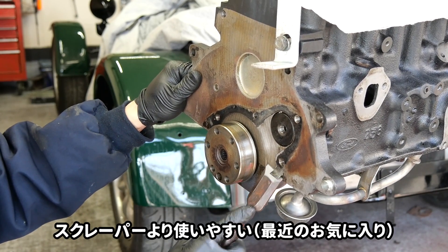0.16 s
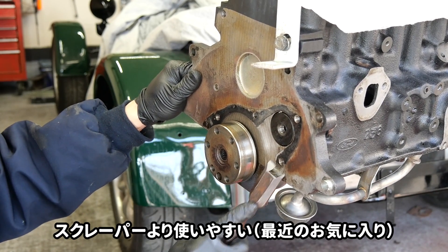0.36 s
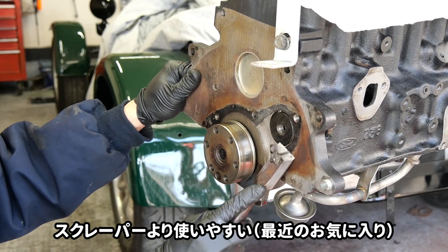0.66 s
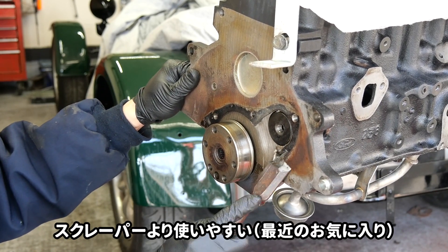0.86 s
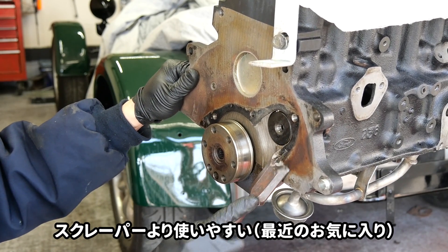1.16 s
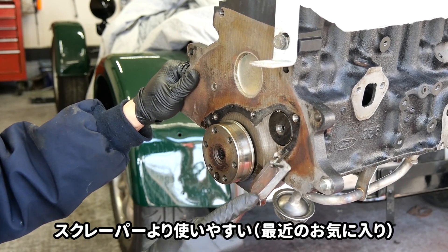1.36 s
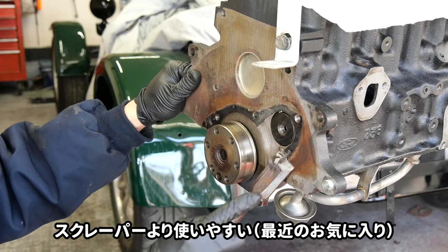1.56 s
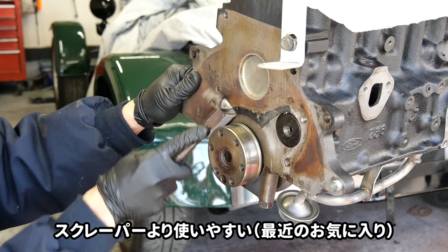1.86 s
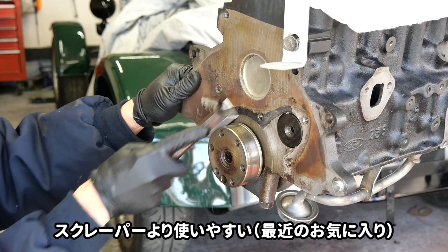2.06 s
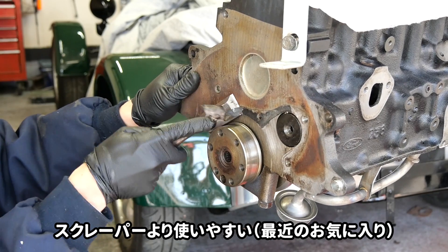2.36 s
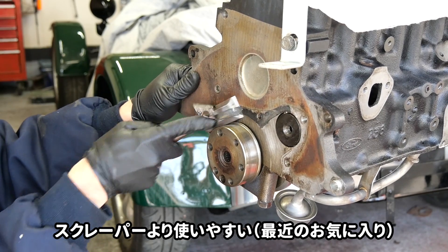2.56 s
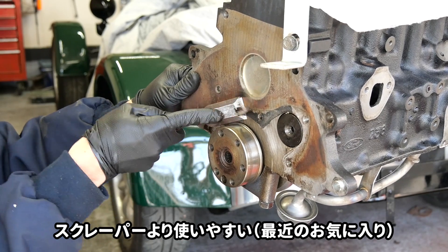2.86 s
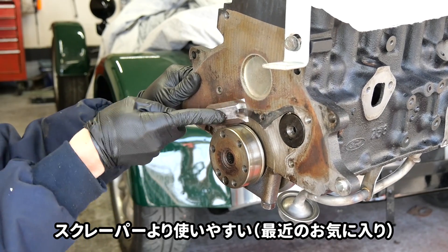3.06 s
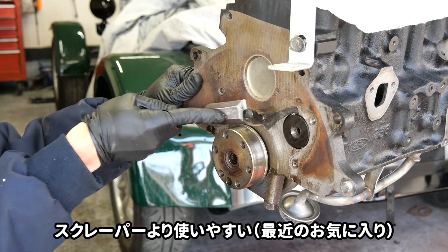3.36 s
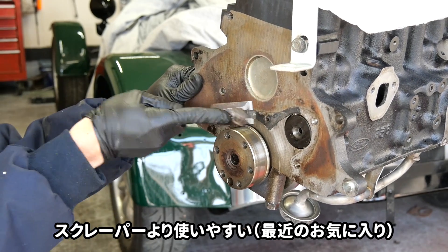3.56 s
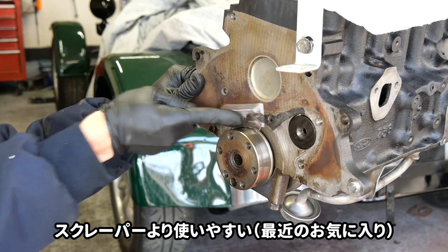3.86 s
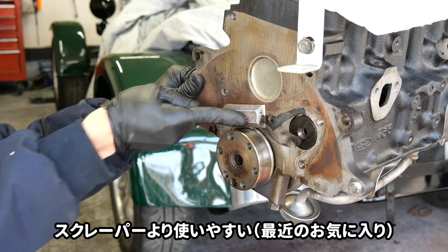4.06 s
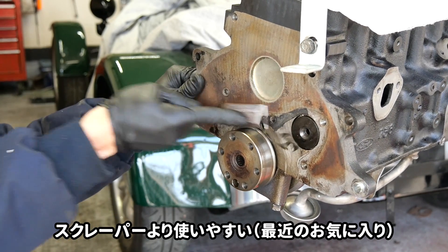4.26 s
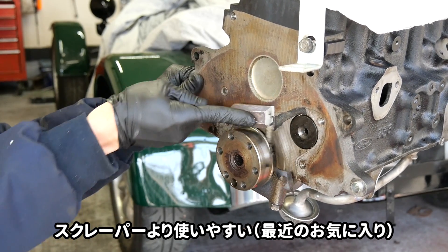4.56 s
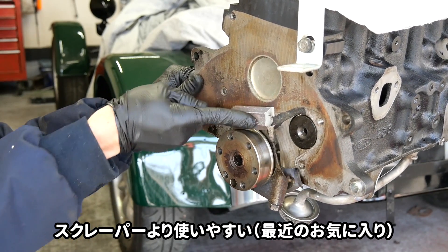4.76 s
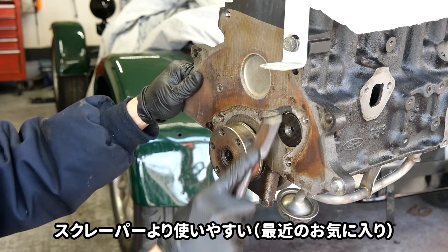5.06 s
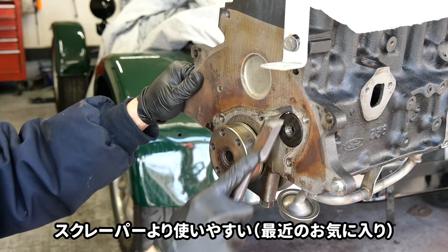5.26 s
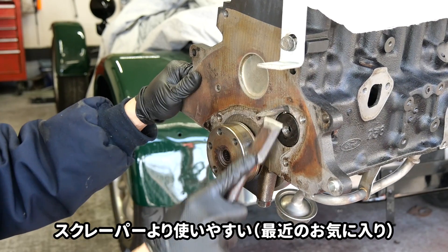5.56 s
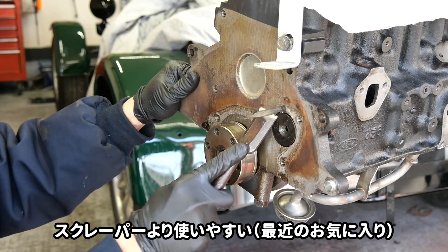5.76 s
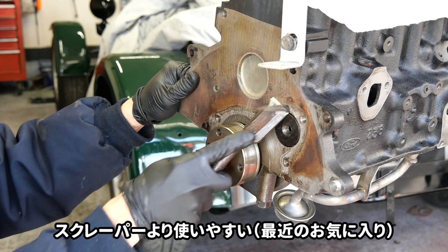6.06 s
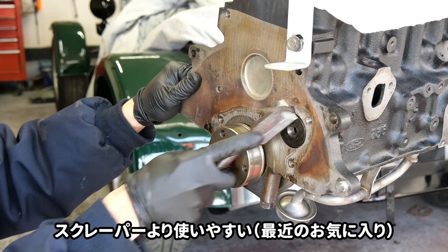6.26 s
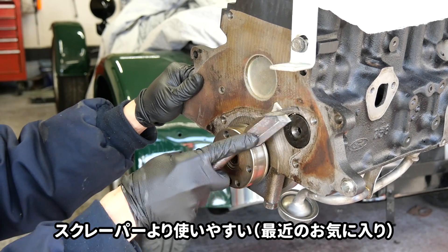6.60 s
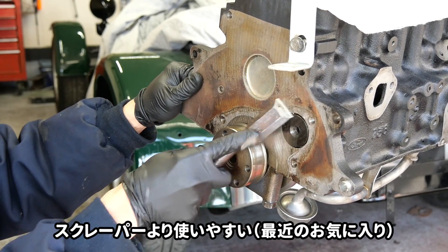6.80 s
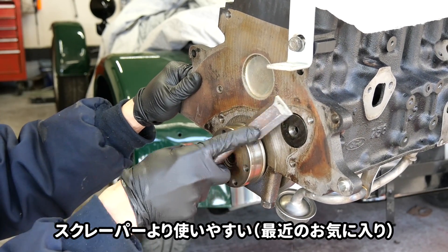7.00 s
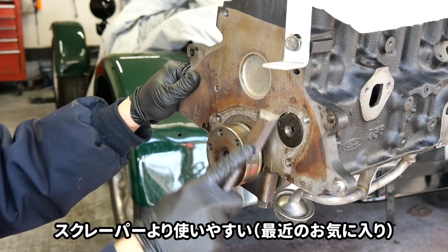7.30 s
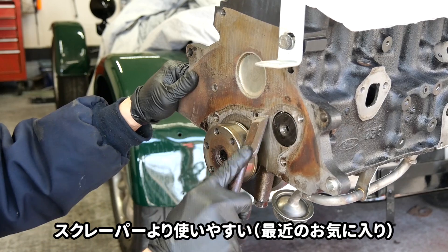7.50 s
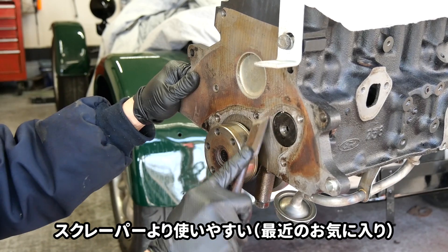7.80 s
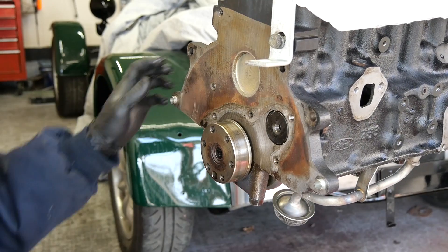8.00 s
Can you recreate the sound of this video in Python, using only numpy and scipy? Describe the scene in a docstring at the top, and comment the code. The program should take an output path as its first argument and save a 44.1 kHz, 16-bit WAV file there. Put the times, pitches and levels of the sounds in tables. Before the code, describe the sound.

A hand chisel scrapes old gasket off a cast engine block, close to the microphone, for about eight seconds. From the start it moves quickly back and forth, roughly five times a second, each stroke a short, dry rasp with a thin metallic ring. Tiny chips tinkle faintly in the first second. The edge jumps and knocks on the casting lightly at 0.7 seconds and harder at 1.9. A stronger scrape bites near 2.9, followed by the sharpest clacks at 3.3, 3.9 and 4.3 seconds. The scraping eases briefly before 5 seconds, then continues a little lighter, with duller knocks around 5.3, 5.7, 6.5, 6.7 and 7.4. A few more chips tick between 4.5 and 6.6 seconds. One longer, light drag rises in pitch near 7.3, before a few last strokes. Underneath lie a soft sleeve rustle and steady workshop hush, with a short reverberation.

```python
"""A workshop, with a stereo camera microphone close to a cast engine block.
A hand chisel scrapes old gasket off the block in quick to-and-fro strokes: the edge sticks and slips,
ringing the blade. Now and then it jumps and knocks on the casting, and chips tinkle.
A sleeve rustles with the work; behind it lie the hush of the shop and a short reverberation."""
import sys
import numpy as np
from scipy import signal
from scipy.fft import rfft, irfft, next_fast_len
from scipy.io import wavfile
from scipy.ndimage import uniform_filter1d

SR = 44100
rng = np.random.default_rng(int(sys.argv[2]) if len(sys.argv) > 2 else 0)


def master(y):
    """Save y as 16-bit WAV."""
    cut = np.clip(np.atleast_2d(y).T, -1, 1)
    pcm = np.round(cut * 32767)  # scale
    wavfile.write(sys.argv[1], SR, pcm.astype(np.int16))


N = 358797
TIME = np.arange(N) / SR

# Colours of the room tone and the cloth. Each row: frequency in Hz, relative level in dB.
SHOP_COLOUR = [(30, -15), (52, -12.5), (220, -10.5), (320, -12.5), (690, -2.5), (860, 5.5), (1200, -9),
               (3000, -20), (15000, -47)]
CLOTH_COLOUR = [(40, -31), (230, -8.5), (650, -5), (870, 2), (1250, -8.5), (3300, -8.5), (15000, -33)]
# Colours of a knock's dull and sharp parts, then of a scrape's coarse and fine parts. Rows as above.
THUD_COLOUR = [(250, -44), (600, -11.5), (950, 8), (1400, 3), (2400, -52)]
CRACK_COLOUR = [(60, -18), (450, 2), (1200, -5), (4200, 11), (9700, -1.5), (12300, 5.5), (15500, -12)]
RASP_COLOUR = [(250, -49.5), (1900, -4), (2500, 10.5), (4200, 9), (5200, 0.5), (9000, -25.5)]
HISS_COLOUR = [(3500, -20), (6400, 5.5), (7300, -3.5), (8300, -0.5), (10200, -12), (12200, -1.5),
               (15500, -28)]
# Modes of a chip and of the block. Each row: frequency in Hz, relative level in dB, T60 in seconds.
CHIP_MODES = [(9450, 6, 0.57), (9460, 17, 0.026), (10300, 12, 0.059), (11700, -10, .12)]
CASTING_MODES = [(1420, -6, 0.045), (3480, 5, 0.19), (3760, 11, 0.16), (4460, -40, 0.11)]
# The arm's movement. Each row: time in seconds, sleeve level in dB.
SLEEVE_LEVELS = [(0, -46.5), (1.72, -46.5), (2.1, -53.5), (4.4, -53), (4.92, -54.5), (5.3, -52.5),
                 (6.1, -52), (7.7, -55), (7.95, -50), (8.14, -42)]
# Hard bits landing. Each row: start in seconds, relative peak level in dB.
CHIP_LANDINGS = [(.0583, -49), (.3486, -41), (.5511, -42), (.6526, -40), (4.5121, -42), (4.8888, -53),
                 (5.1996, -47), (5.3996, -39), (5.6052, -47), (6.6024, -45)]
# The edge hits the casting. Each row: start in seconds, clack level in dB,
# hardness from 0 (cushioned by gasket) to 1 (bare steel).
EDGE_KNOCKS = [(0.6865, -29.5, 0.62), (0.9215, -36, 0.52), (1.7451, -30, 0.98), (1.8275, -36, 1),
               (1.8901, -18.5, 0.63), (2.1472, -22.5, 0.49), (3.1825, -34, .4), (3.296, -16.5, 0.92),
               (3.7129, -26, .85), (3.9322, -14.5, 0.95), (4.1404, -26.5, 1), (4.335, -14.5, 0.96),
               (4.5388, -22.5, 0.57), (4.7498, -31, 0.16), (5.079, -31, 0.045), (5.2885, -17.5, .25),
               (5.558, -25.5, .1), (5.689, -25, 0.32), (6.5482, -24, 0.48), (6.7382, -21.5, 0.58),
               (7.3747, -23.5, 0.37), (7.4788, -30.5, 0.19)]
# The grip shifts the blade's lower bending resonance (flex); the edge's angle sets its ring.
# Each row: time in seconds, base frequency in Hz.
FLEX_PITCH = [(0.0, 1820), (0.8, 1580), (1.7, 1710), (2.6, 1536), (4.4, 1610), (6.0, 1730), (7.2, 1610)]
RING_PITCH = [(0.02, 3700), (0.83, 3450), (3.22, 3450), (3.3, 3650), (4.13, 3660), (4.27, 3350.0),
              (4.35, 3700), (5.29, 3340), (5.4, 3660), (5.68, 3200), (6.13, 3670.0), (6.24, 3410),
              (7.03, 3455), (7.91, 3490)]
# Tone along the seam. Each row: time in seconds, flex and grit levels in dB against the ring.
SEAM_TONE = [(0.02, -9, -10), (0.38, -9.5, -6), (0.7, -11, -13), (1.74, -10.5, -11), (1.84, -23, -21),
             (1.91, -12, -12), (2.52, -4, -10.5), (2.86, -11, -19.5), (3.65, -10, -11.5),
             (4.35, -12, -13.0), (5.15, -7, -9), (5.29, -14, -14), (5.36, -10, -10.5), (6.95, -4.5, -11.5),
             (7.03, -8, -11.5), (7.91, -18.5, -12.5)]
# The edge is driven into the gasket, then drawn back over the metal.
# Each row: mid-stroke time in seconds, length in seconds, relative level in dB.
PUSH_STROKES = [(0.075, 0.023, -32.5), (0.275, 0.042, -31.5), (0.476, 0.05, -31.5), (0.703, 0.062, -32.0),
                (0.932, 0.027, -33.5), (1.145, 0.032, -29.0), (1.343, 0.043, -30.5), (1.536, 0.046, -31.5),
                (1.738, 0.048, -30.5), (1.913, 0.07, -32.5), (2.154, 0.078, -32), (2.386, 0.071, -38.5),
                (2.638, 0.06, -30.5), (2.86, 0.044, -19.5), (3.075, 0.035, -32.5), (3.304, 0.065, -29.5),
                (3.514, 0.041, -29), (3.72, 0.04, -32.5), (3.932, 0.072, -32.5), (4.134, 0.038, -33.0),
                (4.351, 0.076, -31.5), (4.544, 0.038, -32), (4.759, 0.043, -36.0), (5.152, 0.032, -36.5),
                (5.363, 0.014, -35.5), (5.531, 0.09, -34.5), (5.683, 0.075, -39), (5.93, 0.047, -39),
                (6.134, 0.045, -38), (6.342, 0.036, -32), (6.54, 0.036, -35), (6.738, 0.038, -31.0),
                (6.947, 0.052, -33), (7.152, 0.068, -34.5), (7.779, 0.044, -37.5)]
PULL_STROKES = [(0.015, 0.038, -43), (0.206, 0.059, -36.0), (0.385, 0.088, -46), (0.618, 0.024, -32.5),
                (0.832, 0.058, -32.5), (1.035, 0.029, -33.5), (1.257, 0.039, -36.5), (1.464, 0.049, -38.5),
                (1.657, 0.058, -36), (1.838, 0.038, -30), (2.053, 0.066, -35), (2.278, 0.087, -37.5),
                (2.525, 0.075, -42), (2.773, 0.06, -28.5), (2.996, 0.052, -36.5), (3.219, 0.056, -34.5),
                (3.433, 0.054, -37.0), (3.649, 0.04, -40.5), (3.855, 0.057, -33.5), (4.065, 0.063, -38.5),
                (4.273, 0.051, -30.5), (4.488, 0.039, -37.0), (4.682, 0.049, -43.5), (5.075, 0.079, -44),
                (5.289, 0.058, -37.5), (5.402, 0.13, -42.5), (5.818, 0.08, -44), (6.056, 0.045, -43.5),
                (6.245, 0.048, -39), (6.45, 0.053, -39.5), (6.645, 0.067, -39.5), (6.856, 0.041, -31.5),
                (7.026, 0.031, -34.5), (7.062, 0.031, -34.5), (7.563, 0.059, -38), (7.693, 0.044, -47.5),
                (7.913, 0.039, -41)]
# Each direction gives: share of the length spent swelling, ring pitch factor, flex and grit offsets in dB.
PUSH_FEEL = (0.52, 1.01, -0.85, 0.55)
PULL_FEEL = (0.51, 0.989, 1.8, -1.4)


def undb(db):
    """Decibels to gain."""
    return 10 ** (np.asarray(db) / 20)


def unit(x):
    """Scale to rms 1."""
    return x / np.sqrt(np.mean(x ** 2))


def match_energy(x, shape):
    """Give x the energy of shape."""
    return x * np.sqrt(np.sum(shape ** 2) / np.sum(x ** 2))


def add(track, s, x):
    """Mix x into the track from s seconds on."""
    i = int(round(s * SR))
    a, b = max(i, 0), min(i + len(x), N)
    if b > a:
        track[a:b] += x[a - i:b - i]


def through(x, ir):
    """Pass x through an impulse response."""
    return signal.fftconvolve(x, ir)[:len(x)]


def colour(x, points, size=1024):
    """Filter x by a minimum-phase (Hz, dB) curve that falls 12 dB an octave past its ends."""
    hz, db = np.transpose(points)
    f = np.maximum(np.arange(size // 2 + 1) * SR / size, 20)
    octaves_outside = np.maximum(np.log2(hz[0] / f), 0) + np.maximum(np.log2(f / hz[-1]), 0)
    curve_db = np.interp(np.log(f), np.log(hz), db) - 12 * octaves_outside
    cepstrum = irfft(np.log(undb(curve_db)))
    cepstrum[1:size // 2] *= 2
    cepstrum[size // 2 + 1:] = 0
    return through(x, irfft(np.exp(rfft(cepstrum))))


def band(x, kind, hz, order=2):
    """Low-pass or high-pass x."""
    return signal.sosfilt(signal.butter(order, hz, kind, fs=SR, output="sos"), x)


def resonate(x, hz, width_hz):
    """One resonance, gain 1 at its centre."""
    return signal.lfilter(*signal.iirpeak(hz, hz / width_hz, fs=SR), x)


def decay(t, t60):
    """Fall by 60 dB in t60 seconds."""
    return np.exp(-np.log(1000) * t / t60)


def ringing(modes, length=SR // 3):
    """Impulse response of a set of modes."""
    t = TIME[:length]
    return sum(undb(db) * np.sin(2 * np.pi * hz * t) * decay(t, t60) for hz, db, t60 in modes)


def drift(turns_per_s):
    """A slow random wobble of rms 1."""
    k = int(SR / turns_per_s)
    steps = np.repeat(rng.standard_normal(N // k + 1), k)
    return unit(uniform_filter1d(steps, k)[:N])


def shop_air(level_db=-58):
    """Room tone: the steady hush of the workshop."""
    return undb(level_db) * unit(colour(rng.standard_normal(N), SHOP_COLOUR, size=8192))


def reflections(t60, treble_t60, delay_s):
    """Dense echoes of unit energy that build up after a delay and lose their treble first."""
    t, noise = TIME[:SR], rng.standard_normal(SR)
    low = band(noise, "low", 6000) * decay(t, t60)
    high = band(noise, "high", 8000) * decay(t, treble_t60)
    build_up = 1 - np.exp(-(t / delay_s) ** 2)
    return match_energy((low - 0.57 * high) * build_up, np.ones(1))


def sleeve(flutter_db=1.65):
    """Cloth rubbing on cloth, fluttering with the arm."""
    cloth = unit(colour(rng.standard_normal(N), CLOTH_COLOUR, size=4096))
    return cloth * undb(np.interp(TIME, *np.transpose(SLEEVE_LEVELS)) + flutter_db * drift(22))


def chips(tick_gain=9, trim_db=5):
    """Chips land with a bright tick and a thin ring; each landing favours other modes."""
    out = np.zeros(N)
    for s, db in CHIP_LANDINGS:
        ring = ringing([(hz, mode_db + 3 * rng.standard_normal(), t60) for hz, mode_db, t60 in CHIP_MODES])
        burst = rng.standard_normal(len(ring)) * np.exp(-TIME[:len(ring)] / 0.0018)
        tinkle = ring + tick_gain * resonate(burst, hz=7700, width_hz=7300)
        add(out, s, undb(db + trim_db) * tinkle / np.abs(tinkle).max())
    return out


def knocking(chatter=0.17, chatter_s=0.0033, clack_width_hz=2100,
             plate_hz=436, plate_db=-35, plate_t60=9.0):
    """The edge jumps onto the casting: one sharp blow, then brief chatter as it settles."""
    out, t = np.zeros(N), TIME[:SR // 25]
    contact = np.ones(int(.006 * SR))  # each part has the energy of 6 ms at its level
    thuds = []
    for s, clack_db, hardness in EDGE_KNOCKS:
        blow = chatter * rng.standard_normal(len(t)) * np.exp(-t / chatter_s)
        blow[0] += 1
        # a cushioned blow has more thud, less crack and clacks lower
        thud_db = clack_db + np.interp(hardness, (0, 1), (-3, -27.5))
        crack_db = clack_db + np.interp(hardness, (0, 1), (-34, -12))
        clack_hz = np.interp(hardness, (0, 1), (3000, 3950))
        clack = resonate(resonate(blow, clack_hz, clack_width_hz), clack_hz, clack_width_hz)
        parts = [(colour(blow, THUD_COLOUR), thud_db),
                 (band(clack, "low", 6000, order=4), clack_db),
                 (colour(blow, CRACK_COLOUR), crack_db)]
        add(out, s, sum(undb(db) * match_energy(x, contact) for x, db in parts))
        thuds.append((thud_db, s))
    # the heaviest thud leaves the steel front plate singing faintly
    thud_db, s = max(thuds)
    add(out, s, ringing([(plate_hz, thud_db + plate_db, plate_t60)], N))
    return out


def stick_slip(slips_per_s, scatter_db, grinding, patchy_db, count=16000):
    """Friction force: sudden releases at uneven gaps over a fine grinding, as patchy as the residue."""
    gaps = rng.gamma(2, .5, count)
    sizes = undb(scatter_db * np.clip(rng.standard_normal(count), -2, 2))
    at = (np.cumsum(gaps) * SR / slips_per_s).astype(int)
    slips = np.bincount(at[at < N], sizes[at < N], N)
    force = unit(slips - slips.mean()) + grinding * rng.standard_normal(N)
    return force * undb(patchy_db * drift(70))


def blade_mode(force, hz, width_hz, skirt_hz):
    """A steep-skirted resonance of the blade whose centre moves from sample to sample."""
    turn = np.exp(2j * np.pi * np.cumsum(hz) / SR)
    baseband = band(force, "high", 800) * turn.conj()  # a thin blade radiates no bass
    for width in (width_hz, skirt_hz):
        baseband = signal.lfilter([1], [1, -np.exp(-np.pi * width / SR)], baseband)
    return (baseband * turn).real


def strokes(drag_at_s=7.335, drag_s=0.23, drag_hz=3050, drag_hz_per_s=1400, drag_db=-39.5):
    """Each stroke's timing, pitch and levels: pushes are grittier, pulls flex the blade more."""
    seam_s, seam_flex, seam_grit = np.transpose(SEAM_TONE)
    for table, feel in ((PUSH_STROKES, PUSH_FEEL), (PULL_STROKES, PULL_FEEL)):
        swell, stiffen, flex_offset, grit_offset = feel
        for mid_s, length, db in table:
            rise = length * swell
            peak_s = mid_s - length / 2 + rise
            ring_hz = stiffen * np.interp(mid_s, *np.transpose(RING_PITCH))
            flex_db = db + flex_offset + np.interp(mid_s, seam_s, seam_flex)
            grit_db = db + grit_offset + np.interp(mid_s, seam_s, seam_grit)
            yield peak_s, rise, length - rise, ring_hz, 0, db, flex_db, grit_db
    # one long, light drag near the end, whose ring climbs as the tool tilts
    yield drag_at_s, drag_s / 2, drag_s / 2, drag_hz, drag_hz_per_s, drag_db, drag_db - 15.5, drag_db - 14


def scraping(ring_wander=0.021, flex_wander=0.066, abrupt_start=2.46, abrupt_stop=2.12,
             ring_trim_db=-0.2, flex_trim_db=1.36, rasp_trim_db=2.0):
    """The chisel, close up: friction swells and stops with each stroke, driving two blade resonances."""
    # steel catching on iron, and dry gasket breaking up
    friction = stick_slip(slips_per_s=480, scatter_db=3.0, grinding=0.49, patchy_db=2.5)
    crumble = stick_slip(slips_per_s=650, scatter_db=4.5, grinding=1.0, patchy_db=3.3)
    rasp = colour(friction + crumble, RASP_COLOUR)
    hiss = colour(crumble, HISS_COLOUR)
    usual_hz = np.mean(np.array(RING_PITCH)[:, 1])
    rocking = drift(35)  # the edge rocks as it travels
    out = np.zeros(N)
    for peak_s, rise, fall, ring_hz, glide_hz_per_s, ring_db, flex_db, grit_db in strokes():
        span = slice(max(int((peak_s - 2 * rise) * SR), 0), int((peak_s + 2 * fall + .01) * SR))
        t = TIME[span] - peak_s
        from_peak = np.abs(t / np.where(t < 0, rise, fall))
        pressure = np.exp(-from_peak ** np.where(t < 0, abrupt_start, abrupt_stop))
        force = friction[span] * pressure
        ring_path = (ring_hz + glide_hz_per_s * t) * (1 + ring_wander * rocking[span])
        # a stiffer contact lifts both resonances together
        flex_hz = np.interp(peak_s, *np.transpose(FLEX_PITCH)) * np.sqrt(ring_hz / usual_hz)
        flex_path = flex_hz * (1 + flex_wander * rocking[span])
        # the broad rasp grows with both the bite of the blade and the grit under it
        rasp_db = np.mean([ring_db, flex_db, grit_db])
        parts = [(blade_mode(force, ring_path, width_hz=240, skirt_hz=1200), ring_db + ring_trim_db),
                 (blade_mode(force, flex_path, width_hz=160, skirt_hz=600), flex_db + flex_trim_db),
                 (rasp[span] * pressure, rasp_db + rasp_trim_db),
                 (hiss[span] * pressure, grit_db)]
        out[span] += sum(undb(db) * match_energy(x, pressure) for x, db in parts)
    return out


def scene(casting_db=-17, near_db=-11, scrape_room_db=-13.5, knock_room_db=-9.0,
          side_db=-21, treble_width_db=-18):
    """Tool and casting near the microphone; knocks shake the whole block and so fill the shop more."""
    scrapes, knocks, tinkles = scraping(), knocking(), chips()
    background = sleeve() + shop_air()
    contact = scrapes + knocks
    casting = undb(casting_db) * match_energy(through(contact, ringing(CASTING_MODES)), contact)
    off_engine = through(contact, reflections(t60=0.028, treble_t60=0.0058, delay_s=0.00029))
    send = undb(scrape_room_db) * (scrapes + casting + tinkles) + undb(knock_room_db) * knocks
    room, room_side = (through(send, reflections(t60=0.38, treble_t60=0.34, delay_s=0.008))
                       for _ in range(2))
    mid = contact + tinkles + casting + undb(near_db) * off_engine + room + background
    side = undb(side_db) * (room_side + sleeve() + shop_air())
    # a faint phase-shifted copy of the treble slightly widens the stereo image
    treble = signal.sosfiltfilt(signal.butter(2, 5200, "high", fs=SR, output="sos"), mid)
    side += undb(treble_width_db) * signal.hilbert(treble, next_fast_len(N)).imag[:N]
    return np.array([mid + side, mid - side])


def record(dry):
    """The recorder flattens the sharpest peaks and cuts the top."""
    ceiling, top_hz = .58, 15800
    held = dry / (1 + (dry / ceiling) ** 4) ** (1 / 4)
    return signal.sosfilt(signal.ellip(10, .2, 70, top_hz, fs=SR, output="sos"), held)


dry = scene()
out = record(dry)
master(out)
```